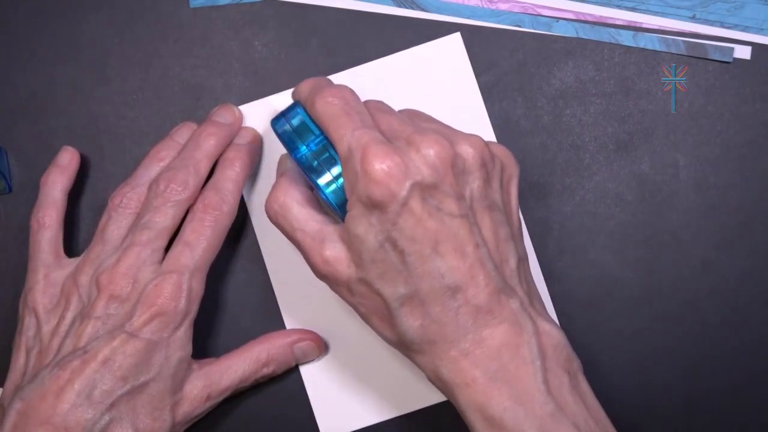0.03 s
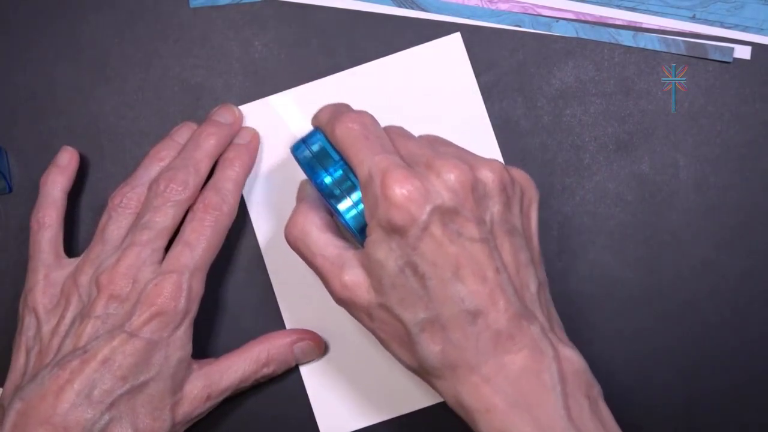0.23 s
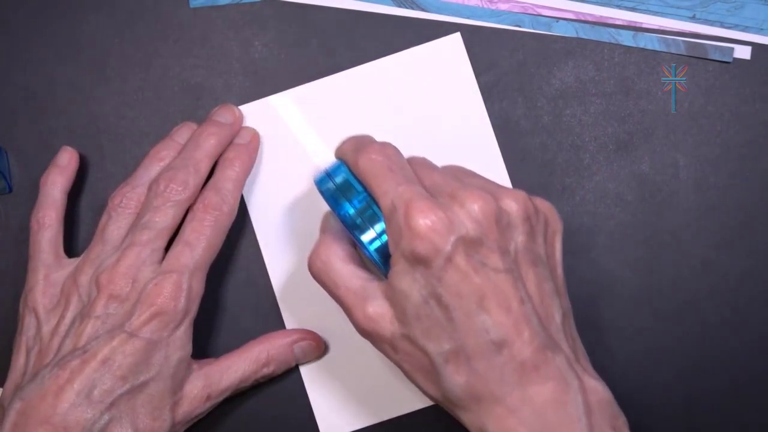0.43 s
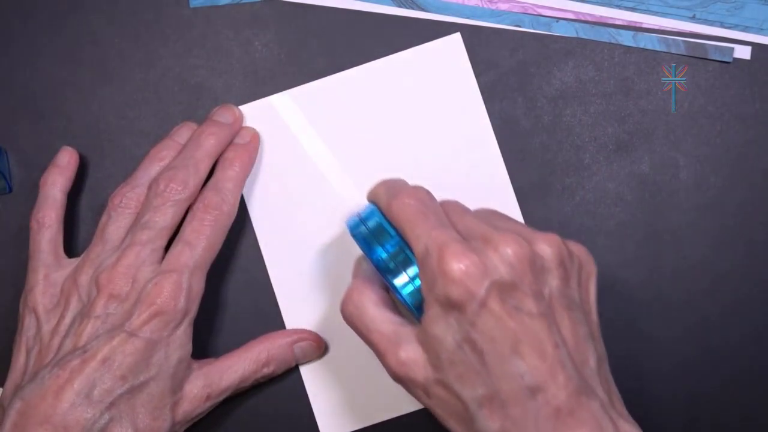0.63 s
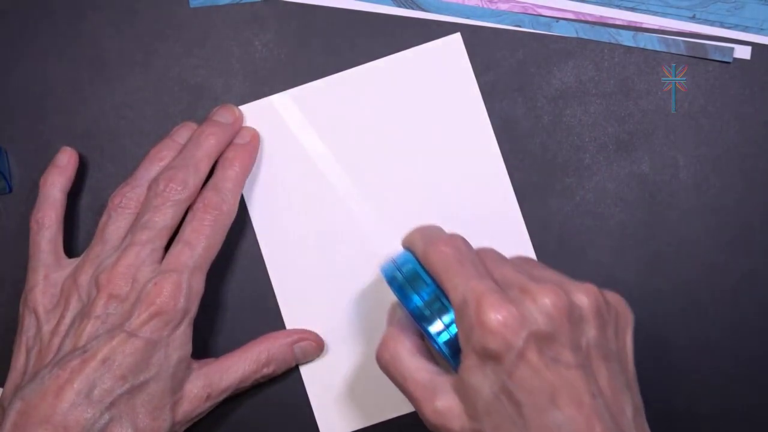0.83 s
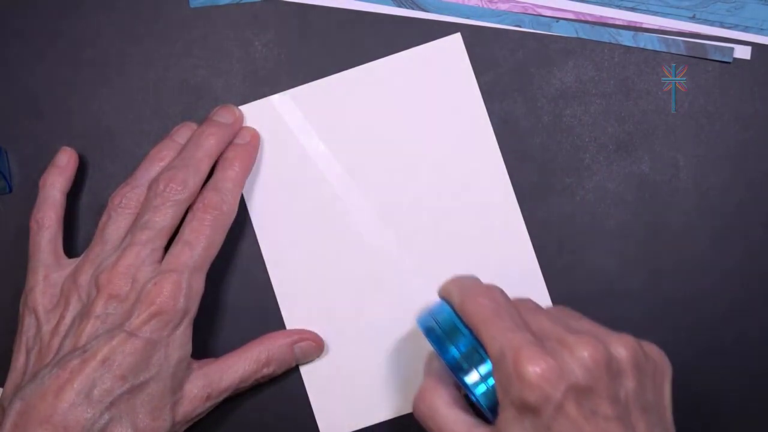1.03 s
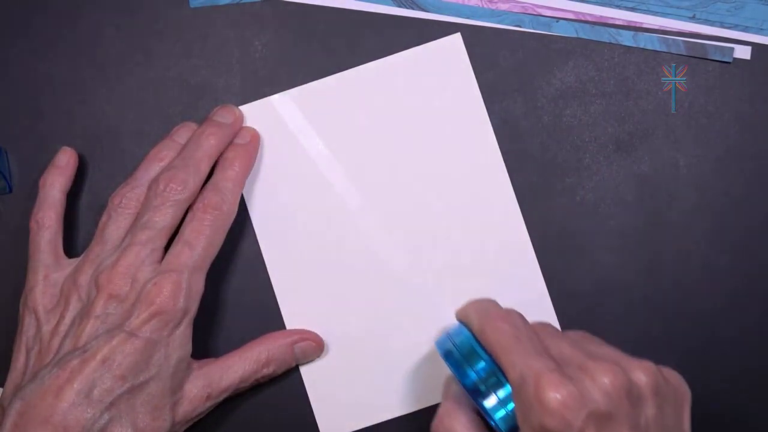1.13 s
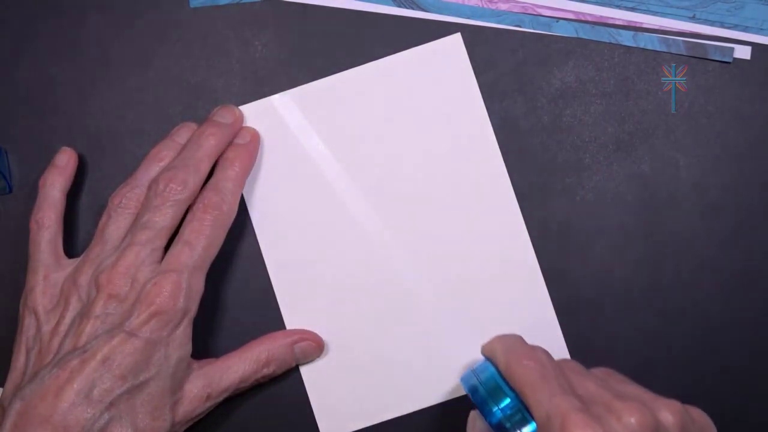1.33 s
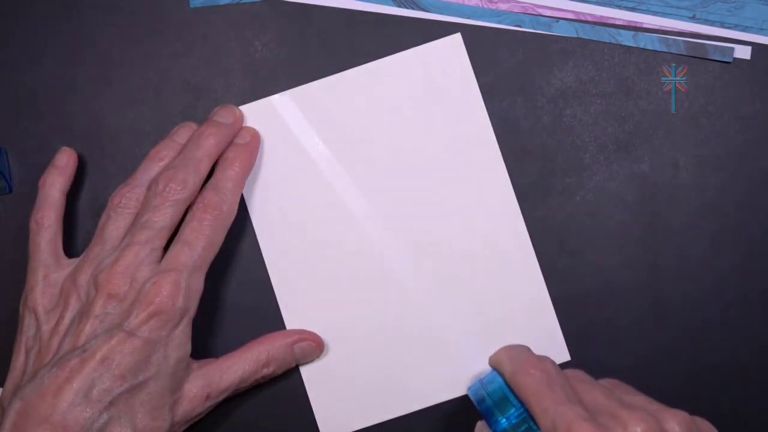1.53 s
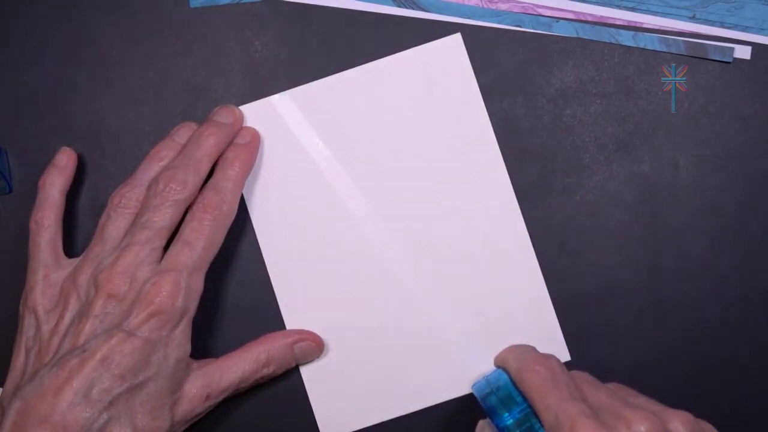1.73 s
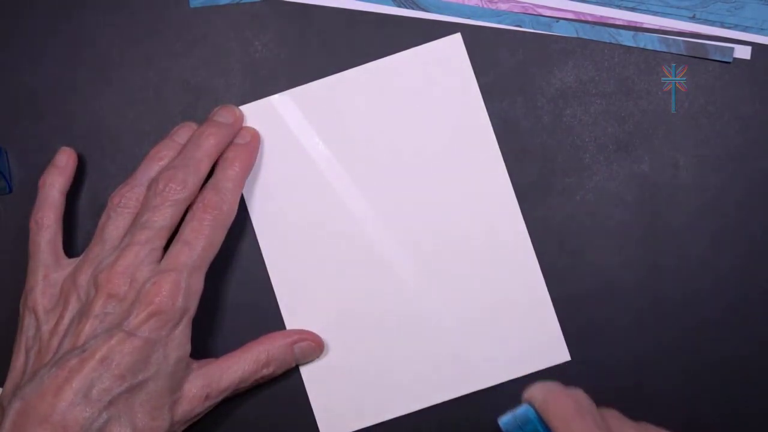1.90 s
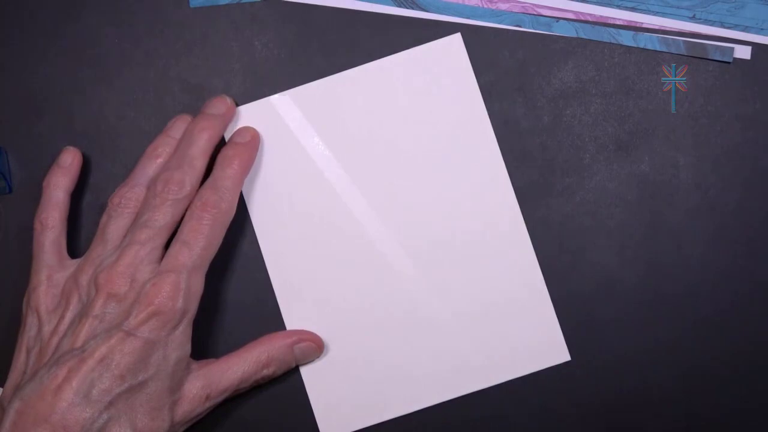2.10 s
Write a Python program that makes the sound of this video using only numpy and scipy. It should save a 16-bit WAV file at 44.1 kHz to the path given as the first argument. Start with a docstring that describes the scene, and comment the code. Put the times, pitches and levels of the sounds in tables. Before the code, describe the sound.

A plastic tape runner is drawn across paper on a desk, heard close up in a small, quiet room. From the start its ratchet ticks lightly, about twenty times a second, each tick a bright snap ringing the hollow case. The ticks quicken to about forty a second and surge twice, loudest around 0.6 to 0.7 seconds and again from 1.0 to 1.2. Underneath, tape rubs softly on the paper, glue crackles finely and the roller gives faint, brief groans. The stroke ends at about 1.35 seconds, and four separate ticks follow until 1.65. At about 1.8 seconds the runner knocks sharply on the desk and its small parts rattle for a moment. Near 2.1 seconds there is a soft bump and a hand begins sliding over the desk. Faint room tone and a low desk rumble lie beneath it all.

```python
"""A desk in a small, quiet room, the microphone close to a plastic tape runner drawn across paper.
Its ratchet ticks slowly, then races in two surges, each snap of the pawl ringing the case. Under it
the tape rubs, glue crackles and the tip roller groans. Four last ticks come as the hand stops.
The runner then knocks on the desk and rattles, and a hand starts to slide over faint room tone."""
import sys
import numpy as np
from scipy import signal
from scipy.fft import rfft, irfft
from scipy.io import wavfile
from scipy.ndimage import uniform_filter1d

SR = 44100
rng = np.random.default_rng(int(sys.argv[2]) if len(sys.argv) > 2 else 0)


def materialize(psi):
    """Save the field psi as 16-bit PCM at rate SR to the path in sys.argv[1].

    A 1-D psi becomes a single channel; in a 2-D psi each row is a channel.
    """
    bounded = np.clip(np.atleast_2d(psi).T, -1, 1)
    quanta = np.round(bounded * 32767).astype(np.int16)
    wavfile.write(sys.argv[1], SR, quanta)


N = 95300

# turn of the ratchet wheel, which ticks at every whole tooth: t/s, teeth passed
WHEEL_TRAVEL = [(0.0192, 0), (0.1585, 3), (0.2015, 4), (0.2669, 6), (0.3398, 8), (0.4089, 10), (0.4669, 12),
                (0.5662, 16), (0.6125, 18), (0.6903, 21), (0.7351, 23), (0.8093, 26), (0.9245, 31),
                (0.9741, 33), (1.0307, 36), (1.136, 41), (1.2676, 46), (1.3272, 48)]
# force on the pawl, which twice sags and catches again: t/s, relative tick level/dB
PAWL_FORCE = [(.019, -33), (.113, -31), (.24, -36), (.409, -37), (.438, -27.5), (.5, -27.5), (.6, -23),
              (.68, -23), (.855, -29), (.949, -35.5), (.975, -29), (1.15, -27), (1.297, -31), (1.327, -36)]
# a tighter grip raises the case modes and damps the main one: t/s, factor on the mode frequencies
GRIP_TUNING = [(0, 1.01), (.3, 0.97), (.555, 0.98), (.61, 1.067), (.7, 1.02), (.92, .99), (1.1, 1.02),
               (1.24, 1.01)]
# modes of the plastic case: base f/Hz, base width/Hz, relative level/dB pressed, the same eased off
CASE_MODES = [(420, 57, -38, -7.5), (1157, 41, -1, -22), (1364, 56, -1, 3), (1790, 53, -6, -37),
              (2490, 70, -4.5, -10), (2925, 139, 7.5, 2), (3400, 34, -22.5, -20), (3517, 110, 1, -29),
              (3855, 62, 5.5, 3), (4330, 120, -5, 1.5), (4690, 152, 7.5, 3), (5160, 115, 4.5, 1),
              (5454, 108, 2.5, -23), (6000, 210, -2.5, -16), (6740, 124, 3.5, -5.5), (7340, 74, -1.5, -3),
              (8036, 69, 4.5, -9), (8765, 212, 2.5, 1.5), (8280, 140, -30, -0.5), (9920, 57, -2, -27),
              (10760, 480, -16, -37), (11400, 140, -3, -31), (12400, 310, -7.5, -7.5),
              (13700, 500, -20, -20), (13900, 340, -6.5, -15), (14900, 560, -15, -11)]
# single teeth slipping as the hand stops: t/s, relative level/dB
SLIPPING_TEETH = [(1.3664, -30.5), (1.443, -33.5), (1.5165, -31), (1.6332, -37.5)]
# rattles of the case: t/s, relative level/dB, body/dB, treble/dB, chatter length/s
CASE_RATTLES = [(.0515, -44.5, 7, -6, 0.00097), (0.089, -46, -6, -6, 0.00052),
                (1.7866, -40.5, 12, 8.5, 0.0018), (1.801, -46.5, -1, 1, 0.0079), (1.806, -51, 3, 5, .0009),
                (1.8353, -48.5, 2, -4, .0017), (1.864, -42.5, 9.5, -7, 0.0057)]
# small parts ringing on after a jolt: t/s, f/Hz, level/dB, t60/s
PART_PINGS = [(.201, 1310, -30.5, 0.017), (0.268, 1312, -32, 0.021), (1.241, 1379, -34, 0.052),
              (1.389, 3080, -52.5, 0.04), (1.647, 2910, -45.5, 0.055), (1.7884, 5540, -34.5, 0.016),
              (1.8046, 5750, -45, 0.079), (1.819, 4900, -49, 0.046)]
# tape rubbing on paper: f/Hz, relative level/dB
RUB_SPECTRUM = [(150, -16), (380, 4), (600, -3), (850, -1.5), (1250, -9), (1600, 6), (2100, -25),
                (3000, -3), (5000, 0), (9000, -13), (16000, -17)]
# glue strands breaking: f/Hz, relative level/dB
GLUE_SPECTRUM = [(600, -25), (2200, -1), (3200, -3), (5500, -10), (9000, -8.5), (16000, -19)]
# groans of the tip roller: peak t/s, half length/s, f/Hz, level/dB
ROLLER_GROANS = [(.11, 0.04, 1013, -55.5), (0.571, 0.021, 1334, -39.5), (1.03, 0.084, 1188, -45.5),
                 (1.3, 0.036, 1161, -49)]
# knocks on the desk: t/s, peak level/dB
DESK_KNOCKS = [(1.3661, -42.5), (1.7877, -20), (2.141, -39.5)]
# modes of the desk: f/Hz, relative level/dB, t60/s
DESK_MODES = [(350, -14, 0.094), (399, 1, 0.028), (495, 9, 0.006), (670, -31, 0.018), (940, -4, 0.011),
              (1117, -19.5, 0.12), (1570, -30, 0.014), (1830, -23, 0.038)]
# a hand sliding on the desk: f/Hz, relative level/dB
SLIDE_SPECTRUM = [(100, 1), (350, 12), (1200, 1.5), (2500, -4), (6000, -10), (8000, -14), (16000, -34)]
# the desk shaking under the arm: t/s, level/dB
SHAKE_LEVEL = [(0, -42), (.45, -50), (.8, -40.5), (1.35, -46), (1.78, -36.5), (1.93, -56)]
# rumble of that shaking: f/Hz, relative level/dB
SHAKE_SPECTRUM = [(8, -1.5), (16, 20), (27, 5.5), (42, 3.5), (60, -7), (100, -13.5), (250, -72)]
# room tone: f/Hz, relative level/dB
ROOM_SPECTRUM = [(20, -3), (60, -22.5), (115, -12.5), (160, -15.5), (340, -15), (450, -22.5), (700, -15),
                 (850, -22), (1130, -19), (1450, -25), (3000, -36.5), (7000, -42), (16000, -47)]
# decay of the room: f/Hz, t60/s
ROOM_DECAY = [(200, 0.16), (1300, 0.29), (3000, 0.21), (7000, 0.25), (16000, 0.12)]

EASE_OFF_S, SET_DOWN_S = 1.345, 1.75  # the hand eases off the paper between these times
USUAL_DB, USUAL_TEETH_PER_S = -30, 40  # a middling force and speed


def ratchet(size=2048, alike=0.65, trim_db=-0.45, lead_s=0.0004):
    """Close up, each snap of the pawl or rattle rings the plastic case as one tick."""
    t, hz = np.arange(size) / SR, np.fft.rfftfreq(size, 1 / SR)
    out, chatter = np.zeros(N), rng.standard_normal(size)
    for s, db, body_db, edge_db, treble_db, chatter_s, tuning, main_db in ticks():
        fresh, gears = rng.standard_normal((2, size))
        chatter = alike * chatter + np.sqrt(1 - alike ** 2) * fresh  # neighbouring teeth chatter alike
        blow = rfft(pawl_snap(t, s, db, chatter, chatter_s, gears))
        even = 1 / np.sqrt(uniform_filter1d(abs(blow) ** 2, size=35))  # hard contact feeds all bands
        colour_db = (body_db * hump(hz, 1395, 0.86) + edge_db * hump(hz, 6300, 0.4)
                     + treble_db * hump(hz, 13100, 0.75))
        gain = even * case_gain(s, hz, tuning, main_db) * amp(colour_db)
        tick = irfft(blow * causal(gain) * bending(hz)) * (1 - (t / t[-1]) ** 2)
        first_8_ms = tick[:SR // 125]
        add(out, s - lead_s, amp(db + trim_db) * tick / first_8_ms.std())
    return out


def pawl_snap(t, s, db, chatter, chatter_s, gears, buzz_db=-15, buzz_s=0.01, bounce_s=0.0043):
    """Force of one tick: the pawl snaps off a tooth and chatters, and the loose gears buzz on."""
    held = 1 / (1 + (t / max(chatter_s, 0.0005)) ** 6)
    force = chatter * held + gears * amp(buzz_db) * np.exp(-t / buzz_s)
    force[0] += 3.96  # the snap itself
    bounce = amp(min(-15 - 0.6 * (db - USUAL_DB), -3)) * (s < EASE_OFF_S)  # a soft pawl bounces more
    force = force + bounce * np.interp(t - bounce_s * rng.uniform(0.7, 1.3), t, force, left=0)
    dull = signal.lfilter(*signal.butter(1, 6000, fs=SR), force)
    return dull + (force - dull) * np.exp(-t / 0.051)  # the treble dies first


def ticks():
    """Every snap: t/s, level/dB, body/dB, edge/dB, treble/dB, chatter/s, tuning, main mode/dB."""
    s = tooth_times()
    db, tuning = np.interp(s, *np.transpose(PAWL_FORCE)), np.interp(s, *np.transpose(GRIP_TUNING))
    hard_db, chance = db - USUAL_DB, rng.standard_normal((len(s), 2))
    body_db = 1 - 0.96 * hard_db + 4.5 * chance[:, 0]  # a weak tick is hollower
    chatter_s = 0.003 * 2 ** (0.56 * chance[:, 1] - hard_db / 30)  # and chatters longer
    edge_db = 0.5 + 0.09 * hard_db
    treble_db = -2.5 - 0.12 * hard_db + 5 * s  # the treble opens along the stroke
    main_db = -100 * (tuning - 1)
    stroke = zip(s, db, body_db, edge_db, treble_db, chatter_s, tuning, main_db)
    last = [(at, level, -4.5, 0, -3, 0.002, 0.98, 2.4) for at, level in SLIPPING_TEETH]
    rattles = [(at, level, body, -2, treble, length, 1, -9.5)
               for at, level, body, treble, length in CASE_RATTLES]
    return [*stroke, *last, *rattles]


def tooth_times():
    """The moments at which the pawl drops off a tooth during the stroke."""
    at, teeth = np.transpose(WHEEL_TRAVEL)
    return np.interp(np.arange(round(teeth[-1]) + 1), teeth, at)


def case_gain(s, hz, tuning, main_db, main_hz=2880, floor_db=-19, wander_db=2, palm_damping=1.22):
    """Which modes of the case speak depends on how it is held and where the tooth strikes."""
    chance = rng.standard_normal((2, len(CASE_MODES)))
    mode_hz, width, pressed_db, eased_db = np.transpose(CASE_MODES)
    mode_hz, height = mode_hz * tuning, amp(eased_db)
    if not EASE_OFF_S < s < SET_DOWN_S:  # a firm, shifting grip damps the modes and moves them
        mode_hz, width = mode_hz * (1 + 0.027 * chance[0]), width * palm_damping
        height = amp(pressed_db + wander_db * chance[1])
    height = height * amp(main_db * hump(mode_hz, main_hz, 0.083))
    power = height ** 2 / (1 + (2 * (hz[:, None] - mode_hz) / width) ** 2)
    bass_cut = hz / np.hypot(hz, 220)
    return np.sqrt(power.sum(1) + amp(floor_db) ** 2) * bass_cut


def bending(hz):
    """High bending waves cross the plastic faster, so a snap spreads into a brief falling chirp."""
    return np.exp(-2j * np.pi * 0.075 * (2 * np.sqrt(hz) - hz / np.sqrt(SR / 2)))


def small_parts(relative_width=0.086, rise_s=0.00021):
    """Small parts inside the runner buzz briefly after a jolt."""
    t, out = np.arange(SR // 8) / SR, np.zeros(N)
    for s, hz, db, t60 in PART_PINGS:
        envelope = amp(db - 60 * t / t60) * (1 - np.exp(-t / rise_s))
        add(out, s, envelope * rough_tone(hz, relative_width * hz)[-len(t):])
    return out


def tape_rub(grains_per_s=1500, scatter_db=4, hiss=0.15, trim_db=-1, stop_s=1.2, fade_s=0.093):
    """The tip rubs along the paper, catching on its fibres."""
    grains = (rng.random(N) < grains_per_s / SR) * rng.standard_normal(N)
    grains *= amp(scatter_db * np.minimum(rng.exponential(1, N), 4))
    friction = coloured(evened(grains) + hiss * rng.standard_normal(N), RUB_SPECTRUM)
    fade = 0.5 - 0.5 * np.tanh((np.arange(N) / SR - stop_s) / fade_s)
    return amp(rub_db() + trim_db) * fade * friction


def rub_db(base_db=-58, db_per_force_db=0.24, db_per_doubling=3, db_per_s=7.5):
    """Friction under the tip grows with force, with speed and along the stroke."""
    t = np.arange(N) / SR
    at, teeth = np.transpose(WHEEL_TRAVEL)
    teeth_per_s = np.diff(teeth) / np.diff(at)
    doublings = np.interp(t, (at[1:] + at[:-1]) / 2, np.log2(teeth_per_s / USUAL_TEETH_PER_S))
    hard_db = curve(PAWL_FORCE) - USUAL_DB
    return base_db + db_per_force_db * hard_db + db_per_doubling * doublings + db_per_s * t


def glue_crackle(strands_per_s=1800, scatter_db=-1, trim_db=-3.5):
    """Sticky strands of glue break, more loudly as the tape runs faster."""
    breaks = (rng.random(N) < strands_per_s / SR) * rng.choice([-1, 1], N)
    breaks = breaks * amp(scatter_db * np.minimum(rng.exponential(1, N), 3))
    strands = coloured(breaks, GLUE_SPECTRUM)
    strands = irfft(rfft(strands) * bending(np.fft.rfftfreq(N, 1 / SR)), N)
    return amp(rub_db() + trim_db) * (np.arange(N) < EASE_OFF_S * SR) * strands


def tip_roller(width_hz=210):
    """Friction noise drives one resonance of the roller, in groans that swell and fade."""
    t = np.arange(N) / SR
    return sum(amp(db) * np.exp(-((t - s) / half_s) ** 2 / 2) * rough_tone(hz, width_hz)
               for s, half_s, hz, db in ROLLER_GROANS)


def desk_knocks(lowest_hz=300, thump_db=-48.5, paper_edge_s=1.2, bare_desk_db=10):
    """Runner and hand bump the desk; each tick of the stroke thumps it, harder at the sheet's edge."""
    t, out = np.arange(SR // 4) / SR, np.zeros(N)
    ring = sum(amp(db - 60 * t / t60) * np.sin(2 * np.pi * hz * t) for hz, db, t60 in DESK_MODES)
    bass_cut = signal.butter(4, lowest_hz, "highpass", fs=SR, output="sos")
    ring = signal.sosfilt(bass_cut, ring)  # a board radiates little bass
    thumps = [(s, thump_db + bare_desk_db * (s > paper_edge_s)) for s in tooth_times()]
    for s, db in DESK_KNOCKS + thumps:
        add(out, s, amp(db) * ring / abs(ring).max())
    return out


def room(x, patterns=6, step_s=0.05):
    """Runner and hand move, so the echoes reaching the microphone change every few ticks."""
    place, out = np.arange(N) / SR / step_s, x.copy()
    for k in range(patterns):
        steps_away = abs((place - k + patterns / 2) % patterns - patterns / 2)
        crossfade = np.cos(np.pi / 2 * np.minimum(steps_away, 1))
        out += signal.oaconvolve(x * crossfade, echoes())[:N]
    return out


def echoes(near_db=-18.5, near_s=0.0062, tail_db=-18, first_s=0.0035):
    """Quick reflections from things nearby on the desk, then the short tail of a small room."""
    t = np.arange(SR // 4) / SR
    signs = rng.choice([-1., 1.], (2, len(t)))
    near, far = signs * (rng.random((2, len(t))) < 3000 / SR) * (t > first_s)
    near = near * np.exp(-t / near_s)
    hz, age, bands = signal.stft(far, SR, nperseg=256)
    decay = amp(-60 * age / read(ROOM_DECAY, hz)[:, None])
    tail = signal.istft(bands * decay, SR, nperseg=256)[1][:len(t)]
    return amp(near_db) * near / np.linalg.norm(near) + amp(tail_db) * tail / np.linalg.norm(tail)


def background(tone_db=-53, slide_db=-51.5, slide_s=2.105, rise_s=0.03):
    """Room tone, the slow shake of the desk under the arm and, at the end, the sliding hand."""
    air, shake, skin = rng.standard_normal((3, N))
    sliding = 0.5 + 0.5 * np.tanh((np.arange(N) / SR - slide_s) / rise_s)
    return (amp(tone_db) * coloured(air, ROOM_SPECTRUM)
            + amp(curve(SHAKE_LEVEL)) * coloured(shake, SHAKE_SPECTRUM)
            + amp(slide_db) * sliding * coloured(skin, SLIDE_SPECTRUM))


def rough_tone(hz, width_hz):
    """Noise in one resonance, at rms 1."""
    noise = rng.standard_normal(N) + 1j * rng.standard_normal(N)
    shiver = signal.sosfilt(signal.butter(2, width_hz / 2, fs=SR, output="sos"), noise)
    return evened((shiver * np.exp(2j * np.pi * hz * np.arange(N) / SR)).real)


def coloured(x, points):
    """Gives x a spectrum, at rms 1."""
    return evened(irfft(rfft(x) * amp(read(points, np.fft.rfftfreq(N, 1 / SR))), N))


def causal(gain):
    """Frequency response with this gain that rings only after it is struck."""
    cepstrum = irfft(np.log(gain + 1e-6))
    half = len(cepstrum) // 2
    cepstrum[1:half] *= 2
    cepstrum[half + 1:] = 0
    return np.exp(rfft(cepstrum))


def hump(hz, centre_hz, octaves):
    """A bell on the log-frequency axis."""
    return np.exp(-(np.log2((hz + 1) / centre_hz) / octaves) ** 2)


def read(points, hz):
    """Reads a table on a log-frequency axis."""
    f, value = np.transpose(points)
    return np.interp(np.log(hz + 1), np.log(f), value)


def curve(rows):
    """Reads a control curve at every sample."""
    return np.interp(np.arange(N) / SR, *np.transpose(rows))


def add(mix, s, sound):
    """Mixes a sound in at time s."""
    part = mix[max(round(s * SR), 0):][:len(sound)]
    part += sound[:len(part)]


def amp(db):
    """Decibels to gain."""
    return 10 ** (np.asarray(db) / 20)


def evened(x):
    """Scales to rms 1."""
    return x / np.sqrt(np.mean(x ** 2) + 1e-20)


def scene():
    """One microphone close to the runner on its desk, the quiet room behind."""
    close = ratchet() + tape_rub() + tip_roller() + glue_crackle() + desk_knocks() + small_parts()
    return (room(close) + background())[None]


def record(dry):
    """The recorder's band limit, at 15950 Hz."""
    lowpass = signal.firwin(201, 15950, window=("kaiser", 8), fs=SR)
    return signal.oaconvolve(dry, lowpass[None], "same")


dry = scene()
out = record(dry)
materialize(out)
```